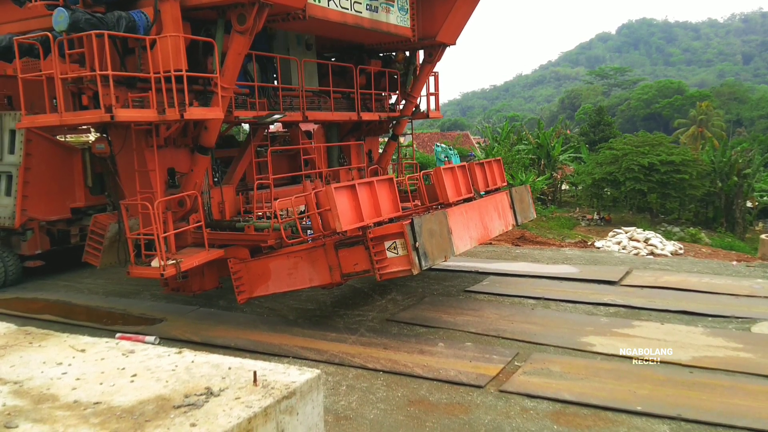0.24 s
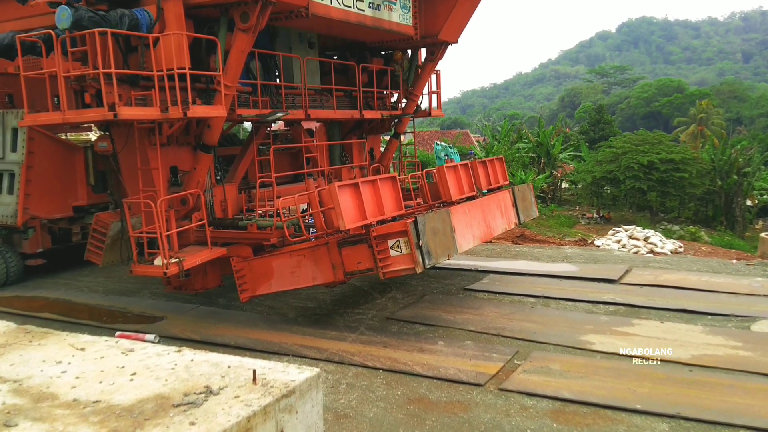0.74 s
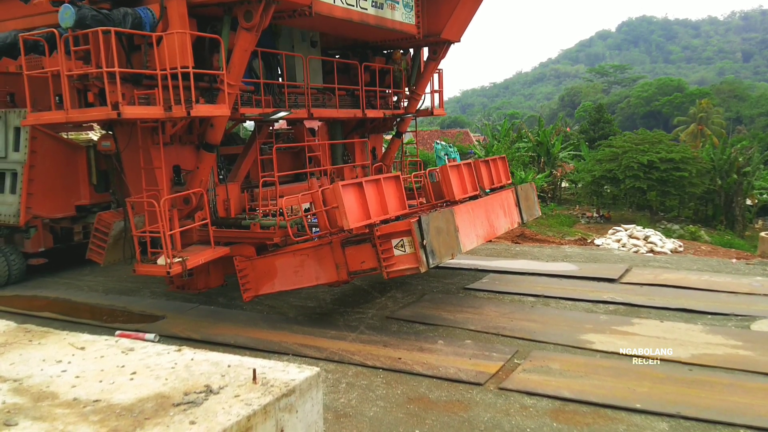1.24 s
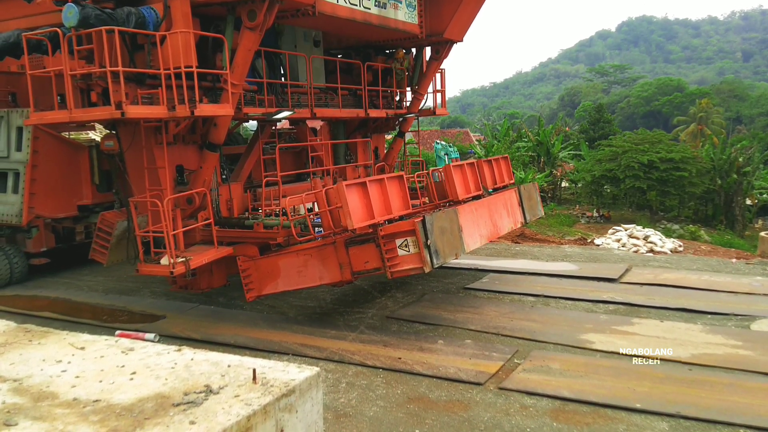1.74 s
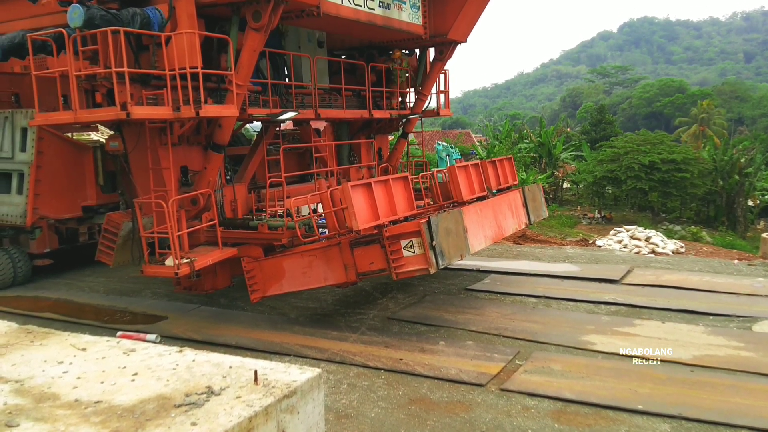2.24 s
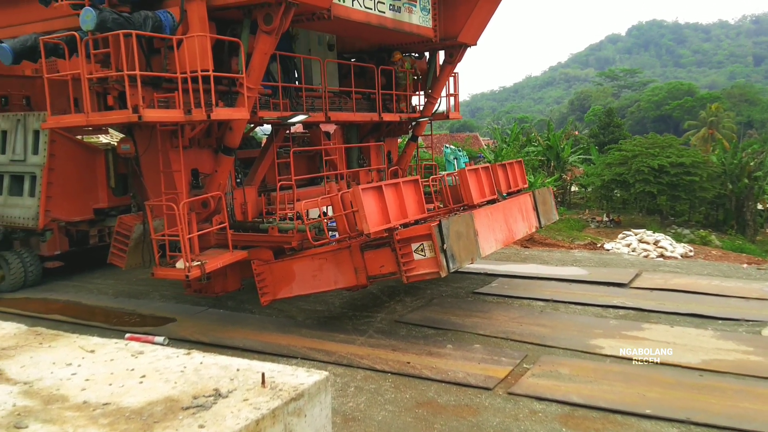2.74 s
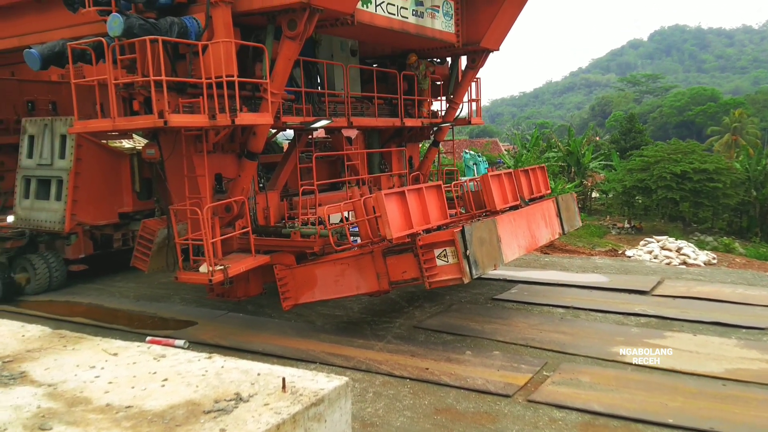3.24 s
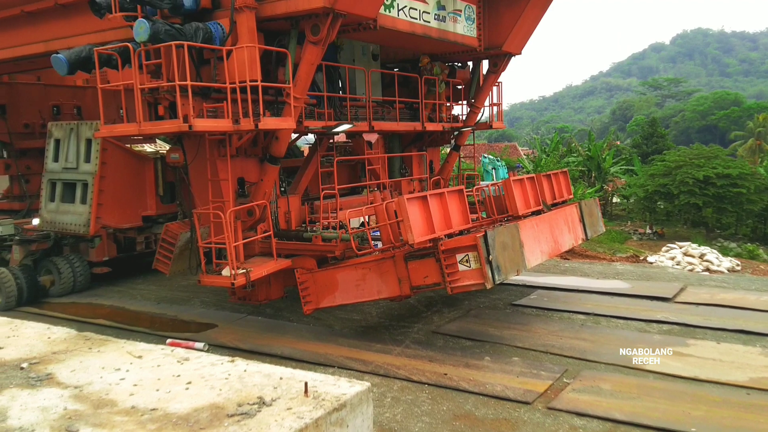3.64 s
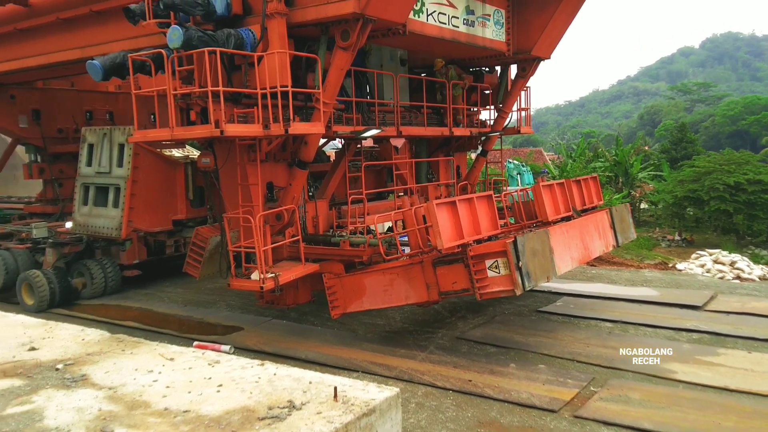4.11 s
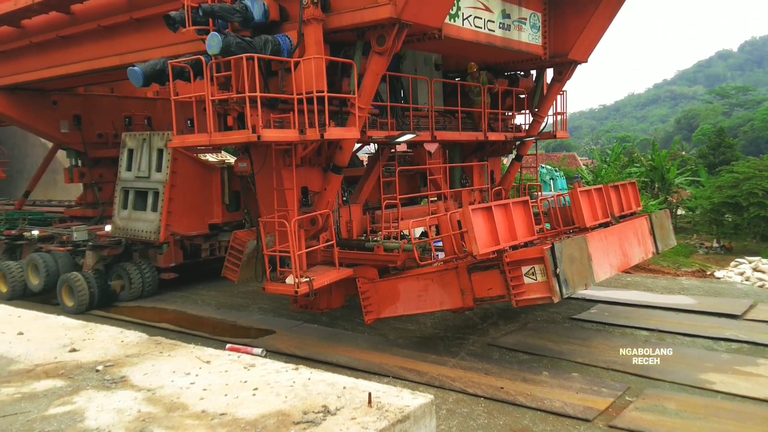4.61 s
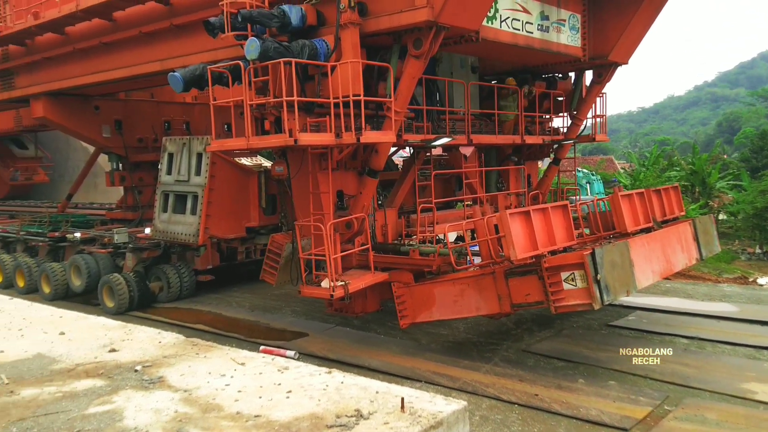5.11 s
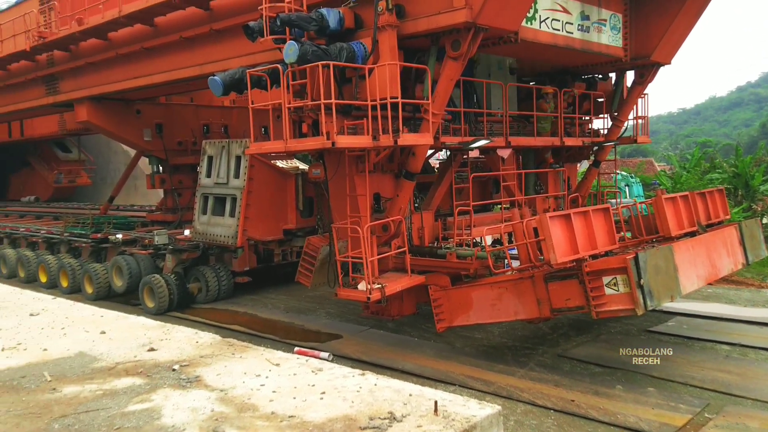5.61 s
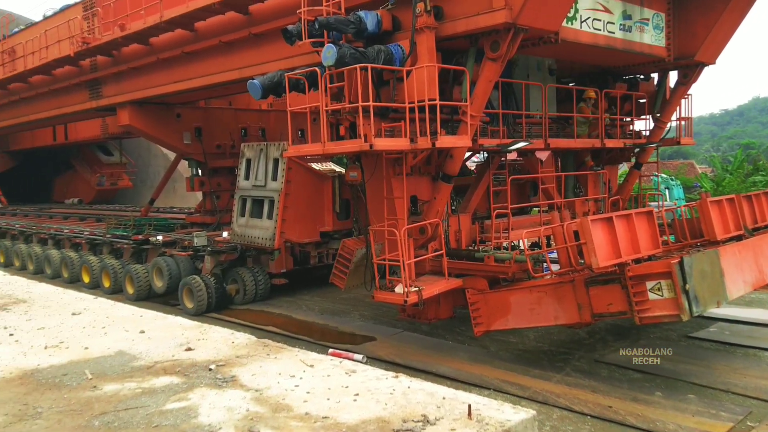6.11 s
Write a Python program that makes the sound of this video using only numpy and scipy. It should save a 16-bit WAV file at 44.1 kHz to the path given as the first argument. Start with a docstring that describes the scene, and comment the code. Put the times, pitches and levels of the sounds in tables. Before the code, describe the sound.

Deep diesel drone, low rumble and bright fan rush fill an open worksite without a break. A short load makes the engine sag and harden right at the start. Thin bearing squeaks come and go, the steel frame clunks in two bursts within two seconds, then high pings and grainy rattles follow, densest near the end. As the stereo microphones turn, hollow resonance between girders becomes stronger.

```python
"""Two diesel engines drone on a heavy transporter outdoors; at once a brief load makes the deep one sag and recover.
Each exhaust is a stack of crank-locked tones; repeating firings and shaped noise make the roar around them.
Loose covers knock throughout as short ringing notes, and thin wavering tones squeak now and then.
Grainy noise rattles once before the steel frame clunks in two bursts, and often later; rough notes ping from 2.3 s.
After four seconds the microphones swing towards the girders, and the hollows between them ring more strongly."""
import sys
import numpy as np
from scipy.fft import rfft, irfft, next_fast_len
from scipy.io import wavfile
from scipy.ndimage import map_coordinates

SR = 44100
rng = np.random.default_rng(int(sys.argv[2]) if len(sys.argv) > 2 else 0)


def master_out(mix):
    """Clip the mix to full scale and print it as 16-bit PCM to the path in sys.argv[1]."""
    frames = np.transpose(np.atleast_2d(mix))
    ceiling = np.clip(frames, -1, 1)
    pcm = np.round(ceiling * 32767).astype(np.int16)
    wavfile.write(sys.argv[1], SR, pcm)


N = 280476
TIME = np.arange(N) / SR  # seconds

# Colour of fan hiss, also lent to steel ticks and cracks: f/Hz, relative level/dB
FAN_COLOUR = [(1800, -10), (3000, 1), (3700, 0), (4300, -2.5), (4900, -6.5), (5700, -5.5), (7000, -14),
              (8100, -24.5), (9000, -14), (10500, -12), (12500, -15.5), (14500, -22.5), (16000, -48)]


def amp(db):
    """Turn decibels into a gain."""
    return 10 ** (np.asarray(db) / 20)


def unit(x):
    """Scale a sound to an average strength (rms) of 1."""
    return x / np.sqrt(np.mean(x ** 2) + 1e-20)


def along(points, hz):
    """Read a table of (f/Hz, value) at any frequency, on a logarithmic axis as pitch is heard."""
    f, value = np.transpose(points)
    return np.interp(np.log(hz + 1), np.log(f + 1), value)


def curve(points):
    """Join (t/s, value) points with straight lines, giving one value per sample."""
    s, value = np.transpose(points)
    return np.interp(TIME, s, value)


def wobble(rate):
    """A smooth random curve through `rate` random points a second."""
    knots = rng.standard_normal(int(N * rate / SR) + 4)
    return map_coordinates(knots, [np.arange(N) * rate / SR])


def swell(peak_s, rise_s, fall_s):
    """An envelope that rises smoothly to 1 and dies away."""
    t = TIME - peak_s
    return np.where(t < 0, np.exp(-(t / rise_s) ** 2), np.exp(-np.abs(t) / fall_s))


def filtered(x, response):
    """Colour a sound by multiplying its spectrum with a response of frequency."""
    n = x.shape[-1]
    padded = next_fast_len(n + SR // 4)  # room for the ringing to die away
    spectrum = rfft(x, padded) * response(np.fft.rfftfreq(padded, 1 / SR))
    return irfft(spectrum, padded)[..., :n]


def resonances(modes, f):
    """Response of a set of resonators (f/Hz, width/Hz, level/dB), with alternating signs."""
    total = 0
    for k, (centre, width, db) in enumerate(modes):
        damping = 1j * f * width
        total = total + (-1) ** k * amp(db) * damping / (centre * centre - f * f + damping)
    return total


def diffuse(n):
    """Noise alike at both microphones in the bass, unevenly alike in the middle, nearly unrelated in the treble."""
    # Likeness of left and right: f/Hz, likeness (1 = the same)
    likeness = [(100, .985), (200, .96), (320, .92), (480, .83), (680, .9), (1000, .74), (1250, .58),
                (1550, .85), (1900, .5), (2250, .76), (2700, .4), (4000, .28), (8000, .08)]

    def mid_and_side(hz):
        angle = np.arccos(np.clip(along(likeness, hz), 0, 1)) / 2
        return np.array([np.cos(angle), np.sin(angle)])

    mid, side = filtered(rng.standard_normal((2, n)), mid_and_side)
    return np.array([mid + side, mid - side])


def rush(colour):
    """Steady stereo noise of rms 1 with a given colour."""
    return unit(filtered(diffuse(N), lambda hz: amp(along(colour, hz))))


def chatter(n, response):
    """Slipping steel grips and lets go unevenly, making grainy stereo noise of rms 1."""
    grains = amp(2.2 * wobble(380)[:n])  # 2.2 dB of unevenness, 380 random points a second
    return unit(filtered(grains * diffuse(n), response))


def add(track, s, sound):
    """Mix a stereo sound into a track at time s."""
    part = track[:, round(s * SR):][:, :sound.shape[1]]
    part += sound[:, :part.shape[1]]


def turned():
    """How far the microphones have swung towards the girders, from 0 to 1."""
    midpoint_s, time_constant_s = 4.28, 0.54
    return .5 + .5 * np.tanh((TIME - midpoint_s) / (2 * time_constant_s))


def swung(x):
    """Turning the microphones changes the arrival times: the right side's lead shrinks."""
    shrink_s = .00009
    shift = shrink_s * SR * turned() / 2
    left, right = x
    earlier_left = map_coordinates(left, [np.arange(N) + shift])
    later_right = map_coordinates(right, [np.arange(N) - shift])
    return np.array([earlier_left, later_right])


def level(db, load_db, turn_db):
    """Level in dB of one layer, following effort, the brief load and where the microphones point."""
    # Effort of the machine: t/s, added level/dB
    effort = [(0, 0.7), (1.5, -0.34), (2.2, -0.5), (3.2, 0.5), (4.1, 0.6), (4.9, -0.9), (5.4, 0.25),
              (6.36, -0.5)]
    load = swell(peak_s=0.19, rise_s=0.59, fall_s=0.19)
    return db + curve(effort) + load_db * load + turn_db * turned()


def hollows():
    """Bays between the girders resonate with noise, most under load and once the microphones face them."""
    # Resonances of the bays, each set applied twice: f/Hz, width/Hz, level per pass/dB
    low_modes = [(559, 63, -0.5), (646, 99, -1)]
    high_modes = [(987, 294, 3), (1124, 306, 4.5), (1345, 280, 1)]

    def ringing(modes):
        return unit(filtered(diffuse(N), lambda f: resonances(modes, f) ** 2))

    low = amp(level(-36.5, load_db=11, turn_db=4.8)) * ringing(low_modes)
    high = amp(level(-40, load_db=9.7, turn_db=12.6)) * ringing(high_modes)
    return low + high


def squeaks(waver_hz=5):
    """Dry bearings sing thin notes: single tones with a trembling pitch that swell and fade."""
    # The notes: f/Hz, level/dB, peak t/s, rise/s, fall/s
    squeak_notes = [(5620, -51, .55, .5, .4), (6169, -42, 1.09, .14, .2), (7220, -53, 3.45, .1, .2),
                    (6010, -51, 4.0, .12, .25)]
    out = 0
    for hz, db, peak_s, rise_s, fall_s in squeak_notes:
        pitch = hz + waver_hz * wobble(39)
        note = np.sin(2 * np.pi * np.cumsum(pitch) / SR)
        out = out + amp(db) * swell(peak_s, rise_s, fall_s) * note
    return out


def pings(note_hz=3684, t60=0.16, attack_s=0.0041, tick_db=-5, tick_t60=0.35):
    """A tight steel joint slips: a noisy tick and one fading note made rough by a fast random waver."""
    # The slips: t/s, level/dB, waver of the note/Hz
    slips = [(2.323, -30, 120), (2.583, -26, 100), (2.949, -26, 40), (3.9878, -27, 55)]
    out, t = np.zeros((2, N)), np.arange(SR // 4) / SR
    for s, db, waver_hz in slips:
        roughness = np.array([wobble(380)[:len(t)] for side in out])
        hz = note_hz + waver_hz * roughness
        ring = np.sin(2 * np.pi * np.cumsum(hz, axis=1) / SR) * amp(-60 * t / t60)
        tick = chatter(len(t), lambda f: amp(along(FAN_COLOUR, f))) * amp(tick_db - 60 * t / tick_t60)
        add(out, s, amp(db) * (ring + tick) * (1 - np.exp(-t / attack_s)))
    return out


def rattles(ring_db=-4.5, crack_db=-9.5, ring_t60=0.2, crack_t60=0.27, snap_db=-9, snap_t60=.04):
    """Loose steel joints knock, some dull and some bright: grainy noise excites their resonances."""
    # Resonances of a joint, applied twice: f/Hz, width/Hz, level per pass/dB
    joint_modes = [(2540, 530, 4.5), (3430, 310, 1), (5100, 840, -1.5)]
    # The knocks: t/s, level/dB, brightness/dB per octave above the lowest resonance (half for the crack)
    rattle_hits = [(.801, -32, 6), (2.943, -25.5, -12), (3.5099, -25.5, 0), (3.6022, -27, 0),
                   (3.985, -25.5, -10), (5.257, -21, -6), (5.4218, -22.5, 3), (5.515, -22.5, 1),
                   (5.7152, -22.5, -3), (6.2629, -24, -2)]
    out, t = np.zeros((2, N)), np.arange(SR // 4) / SR
    lowest_hz = joint_modes[0][0]

    def joint(f):
        return resonances(joint_modes, f) ** 2

    for s, db, tilt_db in rattle_hits:
        def tilt(f):
            return amp(tilt_db * np.log2(np.maximum(f, lowest_hz) / lowest_hz))

        ring = chatter(len(t), lambda f: tilt(f) * joint(f))
        ring *= amp(ring_db - 60 * t / ring_t60)
        crack = chatter(len(t), lambda f: tilt(f) ** .5 * amp(along(FAN_COLOUR, f)))
        crack *= amp(crack_db - 60 * t / crack_t60)
        snap = 1 + amp(snap_db - 60 * t / snap_t60)  # the first instant is harder
        add(out, s, amp(db) * (ring + crack) * snap)
    # the joints keep chafing between the late rattles
    scrape = amp(-35.5) * swell(peak_s=5.31, rise_s=.06, fall_s=.65) * chatter(N, joint)
    return out + scrape


def clunks(scatter_db=-2, scatter_t60=0.33, crack_db=0, crack_t60=0.022, attack_s=0.0015):
    """The loaded frame shifts: a blow and its rebounds ring steel plates and scatter among the girders."""
    # The blows: t/s, level/dB, lowest f/Hz and highest f/Hz that the blow excites
    blows = [(1.089, -13, 215, 790), (1.112, -15.5, 510, 820), (1.736, -13, 310, 1400),
             (1.7508, -20, 400, 2600), (1.7707, -21, 890, 2700), (1.7902, -21, 890, 2900)]
    # Ringing notes of the plates: f/Hz, level/dB, time to fade by 60 dB/s
    plate_modes = [(285, -2, .19), (435, -5, .17), (500, -7, .2), (640, -4, .19), (760, -5, .19),
                   (1010, -12, .18), (1163, -8, .2), (1211, -1, .25), (1297, -4, .13), (1540, -10, .14),
                   (2330, -11, .25), (2590, -11, .32)]
    # Colour of the echoes among the girders: f/Hz, relative level/dB
    scatter_colour = [(150, -13), (300, 10), (800, -6), (1400, -4), (1900, -11), (2600, -13), (4000, -26),
                      (9000, -45)]
    thud_ratio, thud_db, thud_t60 = 1.35, 5, .06
    out, t = np.zeros((2, N)), np.arange(SR // 3) / SR
    for s, db, low_hz, high_hz in blows:
        def contact(hz):
            below_top = 1 / (1 + (hz / high_hz) ** 12)
            return below_top / (1 + (low_hz / (hz + 1)) ** 6)

        ring = 0
        for hz, mode_db, t60 in plate_modes:
            # a random phase, slightly different on each side
            phase = 2 * np.pi * rng.random() + .5 * rng.standard_normal((2, 1))
            fade = amp(mode_db - 60 * t / t60)
            ring = ring + contact(hz) * fade * np.sin(2 * np.pi * hz * t + phase)
        scatter = chatter(len(t), lambda hz: contact(hz) * amp(along(scatter_colour, hz)))
        scatter *= amp(scatter_db - 60 * t / scatter_t60) + amp(crack_db - 60 * t / crack_t60)
        # the plate under the blow gives one short, dead note just above the low edge
        thud = amp(thud_db - 60 * t / thud_t60) * np.sin(2 * np.pi * thud_ratio * low_hz * t)
        add(out, s, amp(db) * (thud + ring + scatter) * (1 - np.exp(-t / attack_s)))
    return out


def knocks(per_s=70, low_hz=200, high_hz=2500, cycles_to_fade=40):
    """Loose covers and linkages knock at random, each ringing briefly on its own note."""
    base_db, spread_db, db_per_octave = -20, 3, -3.6
    out, t = np.zeros((2, N)), np.arange(SR // 10) / SR
    for when, note, size, side in rng.random((int(per_s * N / SR), 4)):
        hz = low_hz * (high_hz / low_hz) ** note
        db = base_db + spread_db * (2 * size - 1) + db_per_octave * np.log2(hz / low_hz)
        side_phase = np.array([[1], [-1]]) * (side - .5)  # places the knock left or right
        ring = np.sin(2 * np.pi * hz * t + side_phase) * (1 - np.exp(-hz * t))
        fade = amp(db - 60 * hz * t / cycles_to_fade)  # high notes die sooner
        add(out, when * (N - 1) / SR, fade * ring)
    return out


def fan_hiss():
    """Rushing fan air makes bright noise whose level flickers slightly."""
    # t/s, level/dB
    hiss_level = [(0, -29.5), (.2, -31.5), (.6, -33), (1.4, -33.5), (2.7, -34), (3.2, -32.8), (4.1, -32),
                  (4.9, -33.5), (5.5, -33), (6.36, -33)]
    return amp(curve(hiss_level) + 0.63 * wobble(21.98)) * rush(FAN_COLOUR)


def firings(cycles, colour, count, decay, size=4096):
    """Cylinders bark as decaying noise bursts, `count` a cycle; the same pattern returns every cycle."""
    place = np.arange(size) / size  # position within one cycle
    barks = rng.standard_normal(size) * np.exp(-decay * (place * count % 1))
    train = np.interp(cycles % 1, place, barks)
    return unit(filtered(train, lambda hz: amp(along(colour, hz))))


def block_clatter(steady):
    """Combustion shakes the engine block: noise, partly repeating every cycle, that surges under load."""
    # Colour of the block: f/Hz, relative level/dB
    block_colour = [(500, -45), (900, -0.5), (1250, 0), (1520, 2), (1680, 6), (1930, -3), (2090, 0.5),
                    (2300, -0.5), (2420, -6), (2760, -6), (2900, -16), (4500, -43)]
    block = unit(rush(block_colour) + amp(-9.5) * firings(steady, block_colour, count=1, decay=1))
    surge_db = 2.2 * swell(peak_s=.17, rise_s=.07, fall_s=.08)  # combustion hardens as the load bites
    return amp(level(-26, load_db=0.54, turn_db=-0.2) + surge_db + 0.77 * wobble(70)) * block


def engine_rumble(deep, steady):
    """The firings of both engines bark through low noise, which throbs as combustion is uneven."""
    # Colour of the exhaust barks: f/Hz, relative level/dB
    pipe_colour = [(30, -30), (70, -6.5), (160, 7), (260, -5), (400, -10.5), (700, -10), (1000, -16.5),
                   (1700, -15), (2400, -20.5), (3500, -79)]
    # Colour of the low noise: f/Hz, relative level/dB
    rumble_colour = [(15, -36), (32, -14), (55, 1), (122, -1.5), (165, 1.5), (215, 0.6), (255, -3.5),
                     (315, -1.8), (385, -7), (760, -8.5), (860, -17), (1200, -18), (2000, -63)]
    barks = amp(-6.5) * firings(steady, pipe_colour, count=8, decay=1.73)
    barks += amp(-8.5) * firings(deep, pipe_colour, count=5, decay=1.7)
    throb = amp(0.27 + 1.7 * wobble(22))  # 22 random points a second
    return amp(level(-18.5, load_db=0, turn_db=1.66)) * (barks + throb * rush(rumble_colour))


def exhaust(cycles, orders, unsteady_db):
    """Tones at multiples of the engine cycle, locked to the crank, each wavering in strength."""
    out = 0
    for k, db in orders:
        strength = amp(db + unsteady_db * wobble(7.3))
        out = out + strength * np.sin(2 * np.pi * (k * cycles + rng.random()))
    return out


def booms(cycles, rows):
    """Single overtones of an exhaust boom between the girders, swelling and fading."""
    out = 0
    for k, db, peak_s, half_s in rows:
        envelope = np.exp(-((TIME - peak_s) / half_s) ** 2)
        out = out + envelope * exhaust(cycles, [(k, db)], unsteady_db=1)
    return out


def exhaust_drone(deep, steady):
    """Both exhausts hum as stacks of tones; the close low tones of the two beat against each other."""
    # Overall level of the deep exhaust's tones: t/s, level/dB
    deep_level = [(0, -15.5), (.35, -19.5), (.9, -15.5), (2.0, -16.5), (2.45, -16.5), (3.3, -14.5),
                  (4.4, -17.5), (5.0, -22.5), (6.36, -20)]
    # Tones of each exhaust: multiple of the engine cycle, level within the stack/dB
    deep_orders = [(4, -12.5), (5, 4.5), (6, -13), (25, -17), (26, -22), (27, -20.5), (37, -18)]
    steady_orders = [(3, -14.5), (6, -11.5), (7, -1), (8, 1.5), (10, -13), (12, -15), (14, -14), (17, -14),
                     (18, -12), (19, -14.5), (20, -11.5), (26, -14.5), (32, -18), (34, -14), (40, -14.5)]
    # The steady engine's fifth multiple, which beats against the deep firing note: t/s, level/dB
    beat_level = [(0, -18.5), (2.5, -34), (3.8, -29), (4.9, -21), (6.36, -19)]
    # Booming overtones: multiple of the engine cycle, level/dB, peak t/s, half length/s
    deep_booms = [(13, -20, 1.8, .5), (18, -20, 2.77, .14), (13, -17.5, 3.32, .16), (8, -21, 4.4, .45),
                  (13, -23, 4.8, .6), (17, -19, 5.9, .3)]
    steady_booms = [(12, -21, .7, .45), (17, -23, .4, .6)]
    drone = amp(curve(deep_level)) * exhaust(deep, deep_orders, unsteady_db=0.5)
    drone += booms(deep, deep_booms) + booms(steady, steady_booms)
    drone += amp(curve(beat_level)) * np.sin(2 * np.pi * (5 * steady + rng.random()))
    steady_gain = amp(level(-20.5, load_db=0.92, turn_db=2.2))
    return drone + steady_gain * exhaust(steady, steady_orders, unsteady_db=2.0)


def deep_firing_rate():
    """Firing rate in Hz of the deep engine: the load pulls it down, it overshoots and settles."""
    sag_hz = 2.9 * swell(peak_s=0.27, rise_s=0.4525, fall_s=.17)
    overshoot_hz = 1.6 * swell(peak_s=.74, rise_s=0.2212, fall_s=.42)
    return 62.55 - sag_hz + overshoot_hz + 0.0945 * wobble(3)


def engines():
    """Two crankshafts turn at their own speeds and drive the drone, rumble and clatter under fan hiss."""
    # four-stroke cycles turned so far; the deep engine fires five times in each
    deep = np.cumsum(deep_firing_rate() / 5) / SR
    steady = np.cumsum(13.0 + .012 * wobble(6)) / SR  # 13 cycles a second
    low_sound = exhaust_drone(deep, steady) + engine_rumble(deep, steady)
    return low_sound + swung(block_clatter(steady) + fan_hiss())


def scene():
    """All sources together, reaching the right microphone first and coloured differently on each side."""
    # f/Hz, left minus right/dB
    balance = [(60, -1.76), (330, -0.5), (500, -3.5), (720, 1), (900, 1.5), (1250, 1.5), (1600, 4.5),
               (2000, -1.5), (2500, -4.5), (3100, 2.5), (4200, 4.5), (5200, 4.5), (6500, -2), (10000, 1.5)]
    # f/Hz, head start of the right side/ms
    right_lead = [(150, 0.038), (400, 0.16), (700, 0.15), (1000, 0.27), (1300, 0.28), (1700, 0.37),
                  (2400, 0.49), (4000, 0.527)]
    sides = np.array([[.5], [-.5]])  # left and right each take half of the difference

    def microphones(hz):
        delay_s = sides * along(right_lead, hz) / 1000
        return amp(sides * along(balance, hz)) * np.exp(-2j * np.pi * hz * delay_s)

    machine = engines() + knocks() + hollows()
    steel = clunks() + pings() + rattles() + squeaks()
    return filtered(machine + steel, microphones)


def record(dry):
    """Round off the highest peaks, then remove everything from 15150 Hz upwards."""
    rounded = dry / (1 + dry ** 12) ** (1 / 12)
    return filtered(rounded, lambda hz: hz < 15150)


dry = scene()
out = record(dry)
master_out(out)
```